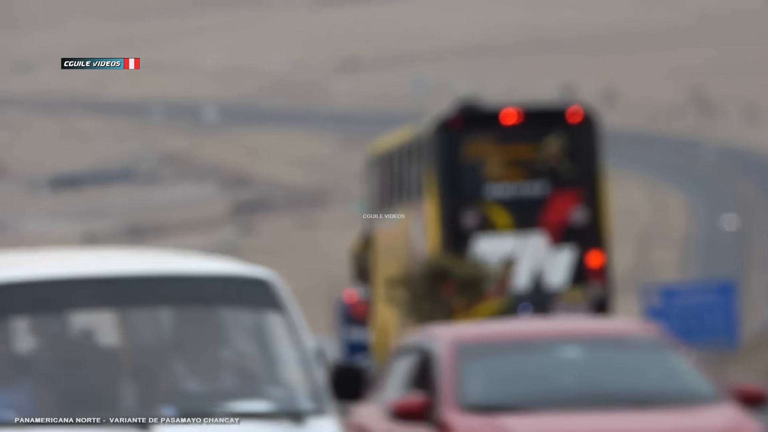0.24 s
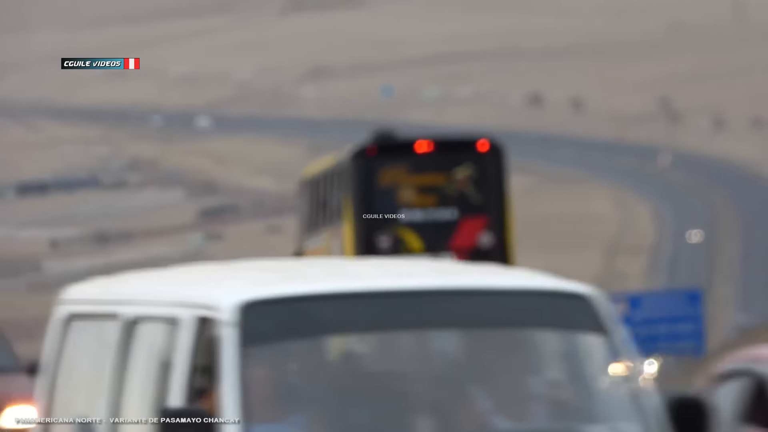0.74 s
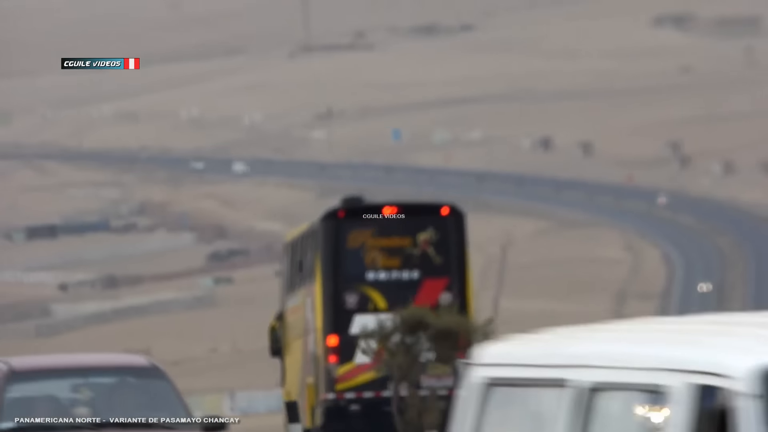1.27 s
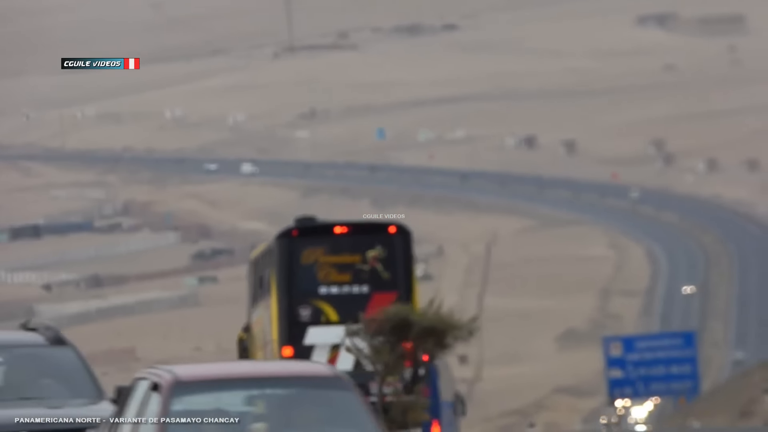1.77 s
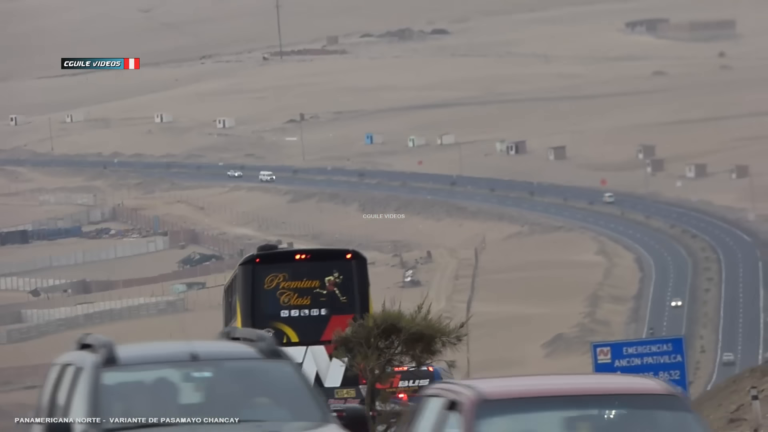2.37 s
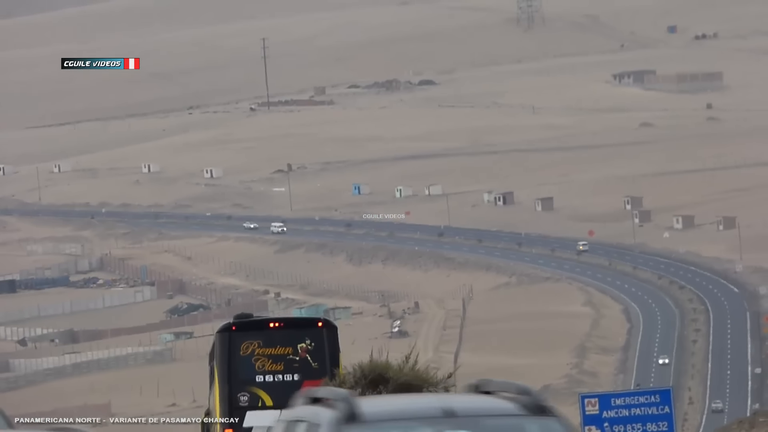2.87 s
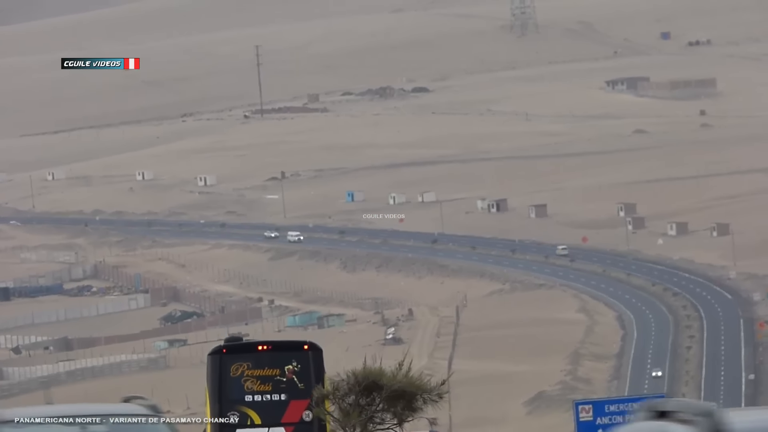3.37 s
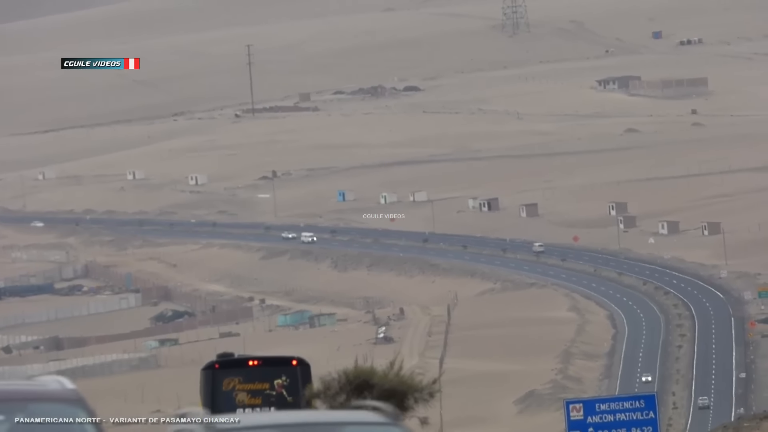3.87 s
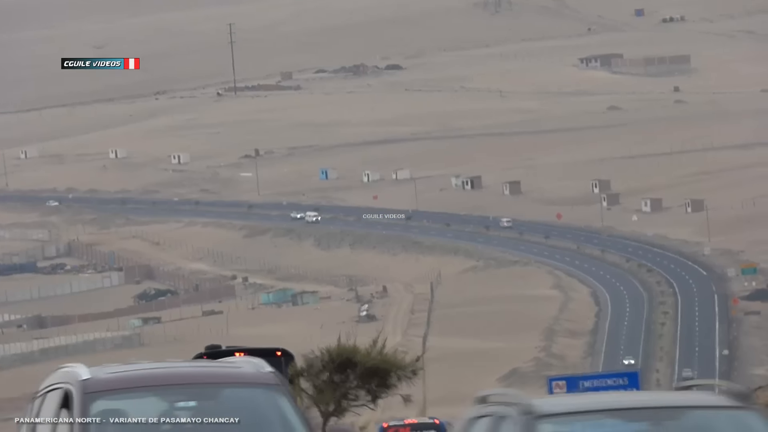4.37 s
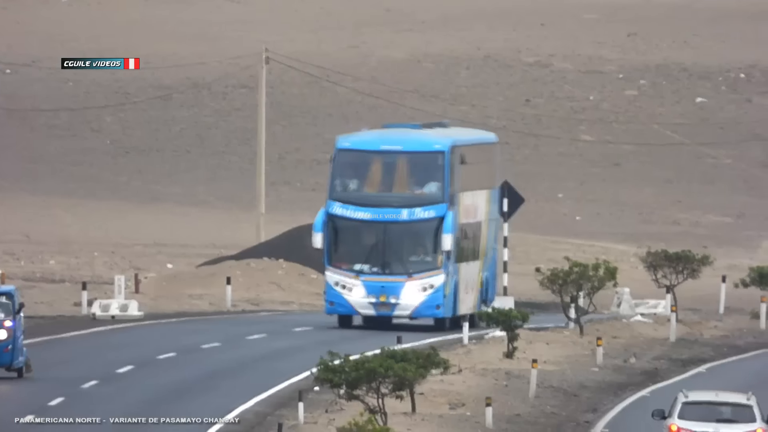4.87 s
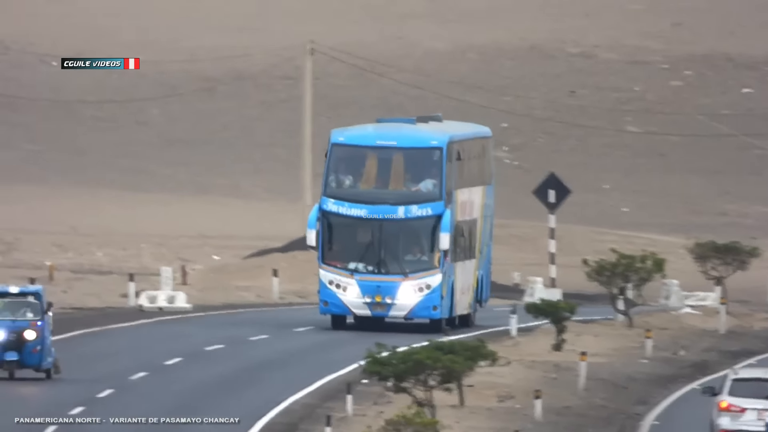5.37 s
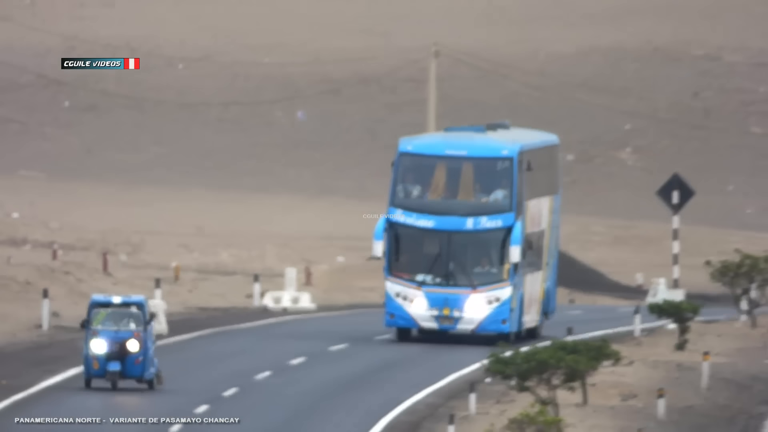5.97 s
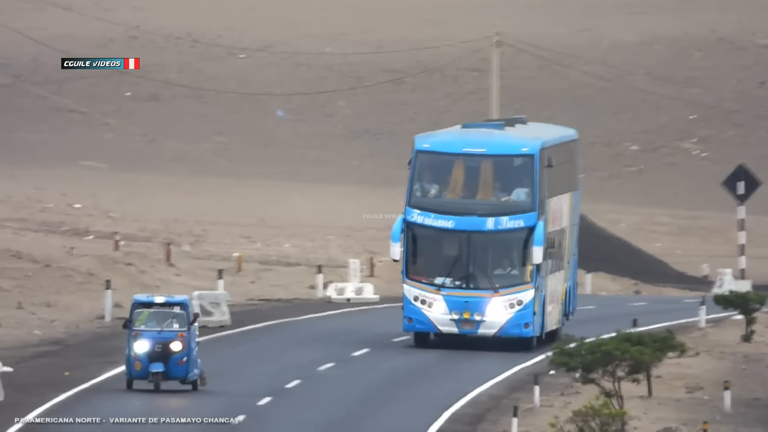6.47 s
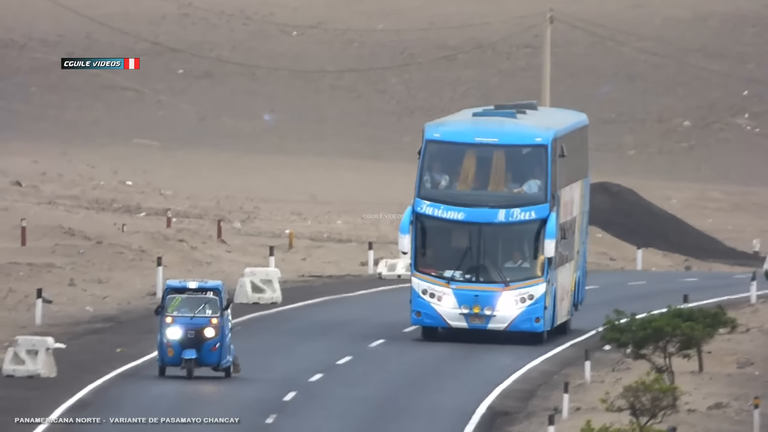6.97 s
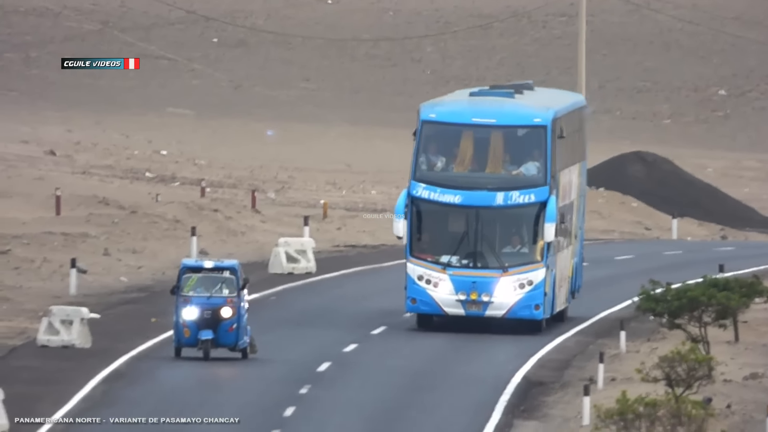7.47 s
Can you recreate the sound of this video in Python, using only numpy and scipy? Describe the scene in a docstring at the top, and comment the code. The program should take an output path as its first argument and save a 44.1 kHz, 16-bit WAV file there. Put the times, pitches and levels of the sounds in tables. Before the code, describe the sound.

Traffic heard from the roadside on a small stereo camera: a broad low-mid roar, then overlapping whooshes of tyres, strongest between two and four seconds, with wavering diesel drones and fast valve clatter. An abrupt short silence separates a second, softer view, where distant road noise and a higher engine drone continue with two small dry clicks, a thin whine, light tyre hiss and another engine rising at the end.

```python
"""First the wide roar of far traffic beside a busy highway, then near tyre noise swelling close to the camera.
Roar and tyre noise are random spectra; road echoes comb the tyres, and drifting bands swell or hollow the hiss.
Diesels drone as wavering orders of their firing rates, and a truck's valves clatter at every firing.
A short silence marks the cut to a second shot, where a thin whine and two small camera ticks are heard.
A small camera with two microphone ports listens."""
import sys
import numpy as np
from scipy import signal
from scipy.fft import rfft, irfft
from scipy.io import wavfile
from scipy.ndimage import uniform_filter1d

SR = 44100
rng = np.random.default_rng(int(sys.argv[2]) if len(sys.argv) > 2 else 0)


def unload_audio(sound):
    """Save the sound as a 16-bit wav file, at the path given as the first command line argument."""
    columns = np.transpose(np.atleast_2d(sound))
    # keep every value between -1 and 1, then stretch to whole-number steps
    steps = np.round(np.clip(columns, -1, 1) * 32767)
    wavfile.write(sys.argv[1], SR, steps.astype(np.int16))


N = 340893
WINDOW, HOP = 1024, 256  # short-time spectra, samples
HZ = np.fft.rfftfreq(WINDOW, 1 / SR)
FRAMES = np.arange(N // HOP + 5) * HOP / SR  # frame times, s
CUT, RESUME = 4.828, 5.0864  # first shot starts to fade out, second starts to fade in, s


def gain_of(db):
    """Decibels to gain."""
    return 10 ** (np.asarray(db) / 20)


def evened(x):
    """Scales to rms 1."""
    return x / np.sqrt(np.mean(abs(x) ** 2) + 1e-20)


def smoothed(x, size, axis=-1):
    """Running average along one axis."""
    return uniform_filter1d(x, size=size, axis=axis)


def read(points, hz=HZ):
    """Reads a spectrum on a log-frequency axis, as a column."""
    f, value = np.transpose(points)
    return np.interp(np.log(hz + 1), np.log(f + 1), value)[:, None]


def columns(rows, t):
    """Each control column read at the times t, and where the rows are sounding."""
    s, *cols = np.transpose(rows)
    sounding = (t >= s[0] - .03) & (t <= s[-1] + .03)
    return [np.interp(t, s, c) for c in cols], sounding


def above(hz, octaves):
    """Rises from 0 to 1 around hz."""
    return (.5 + .5 * np.tanh(np.log2((HZ + 1) / hz) / octaves))[:, None]


def swell(t, s, db, rise, fall):
    """Gain of a source that nears, is loudest at s and leaves; silent in the other shot."""
    away = (t - s) / np.where(t < s, rise, fall)
    loss_db = -15.5 * np.log10(1 + away ** 2)
    same_shot = (t < RESUME - .1) == (s < RESUME - .1)
    return gain_of(db + loss_db) * same_shot


# The two microphone ports, three lists in each table: far roar of shot 1, all of shot 2, near vehicles of shot 1.
# How alike the ports hear. Each row: frequency in Hz, likeness (1 alike, 0 or less unrelated).
PORT_LIKENESS = [
    [(300, 2), (600, 0.8), (850, 0.3), (1050, 0.76), (1350, .2), (1700, 0.45), (2000, .8), (3000, .72),
     (4000, 0.75), (5000, 0.6), (6000, 0.5), (7000, 0.5), (9000, -0.1), (15000, 0.6)],
    [(300, 1.5), (600, 0.8), (850, 0.8), (1150, 0.74), (1400, 0.6), (1700, 0.8), (2000, 0.7), (2500, 0.7),
     (3500, .8), (4000, 0.8), (4500, .65), (6000, .47), (7000, 0.6), (9000, .5), (15000, 1.1)],
    [(300, .97), (600, .93), (800, .8), (1050, 0.6), (1400, 0.5), (1700, .9), (2500, 0.2), (3500, 1.2),
     (4000, .92), (5000, 1.5), (6000, 0), (7000, -0.3), (9000, -0.1), (15000, -0.5)],
]
# How far the left port leads. Each row: frequency in Hz, lead in radians.
PORT_LEAD = [
    [(300, -1), (600, -.5), (800, -1.1), (1000, -1.5), (1200, -1.9), (1380, -3.5), (1600, -5), (2000, -5.5),
     (3000, -6), (4500, -6.1), (6000, -6), (7000, -6.5), (9000, -7), (12000, -6.5)],
    [(300, -0.027), (600, .2), (900, -0.2), (1300, 0.52), (1700, .2), (2000, 0.31), (2500, -0.87),
     (3500, -.5), (4000, -0.12), (5000, -0.53), (6000, -0.37), (12000, -.05)],
    [(300, 0.1), (600, -0.9), (800, -2.1), (1000, -3), (1200, -4.4), (1400, -5), (2000, -6), (3500, -6),
     (4500, -7), (6000, -5.5), (7000, -7.5), (12000, -6.3)],
]
# How the level leans to one port. Each row: frequency in Hz, left over right in dB.
PORT_LEAN = [
    [(300, 12), (700, -1.5), (1000, -1.5), (1400, -6.5), (1800, -3), (2400, -4), (4400, -2), (8000, -0.5),
     (15000, -1.5)],
    [(300, -2.5), (750, 4.5), (1200, -2.5), (1600, 1.5), (2100, -1.5), (3000, -1), (5500, -0.5),
     (15000, -1)],
    [(300, -1), (700, 0), (1100, -7.5), (1600, -5.5), (2400, -5), (4400, -2), (8000, -13), (15000, -1)],
]


def noise(shape, level, port, ridges, patchy_db, ripple_db, side_db=0):
    """Random short-time spectra of rms level, with drifting patches, heard through both ports."""
    a, b, c, d, patches, ripple = rng.standard_normal((len(FRAMES), len(HZ), 6)).T
    patches = evened(smoothed(smoothed(patches, 8, axis=0), 24, axis=1))
    ripple = evened(smoothed(ripple, 60, axis=1))  # random narrow, slow ridges give the hiss a fine grain
    like, lead, lean_db = (np.where(FRAMES < CUT + .1, read(table[port]), read(table[1]))
                           for table in (PORT_LIKENESS, PORT_LEAD, PORT_LEAN))
    aside = above(450, 0.55)  # bass bends round the camera and reaches both ports alike
    # a swelling band comes from one place, so the ports hear it more alike
    unlike = np.clip((1 - like) / ridges ** .8, 0, 1)
    like = .987 * (1 - unlike * aside)
    left = a + 1j * b
    right = like * left + np.sqrt(1 - like ** 2) * (c + 1j * d)
    right = right * np.exp(-1j * lead * aside)
    lean = gain_of((lean_db + side_db) * aside / 2)
    unit = np.sqrt(3 / WINDOW)  # rms 1 once the windows overlap
    texture = gain_of(patchy_db * patches + ripple_db * ripple)
    return np.array([left * lean, right / lean]) * shape * level * unit * texture


# Far traffic, one list a shot. Each row: time in seconds, level in dB, lift of the treble above about 2.4 kHz in dB,
# lift of the bass below about 340 Hz in dB.
TRAFFIC = [
    [(0, -24, 0, 0.5), (.7, -23, -4.5, -6), (1.6, -22.5, 1.5, -2), (2.3, -24, 3, -3), (3.0, -22, 2, -1),
     (3.4, -23.5, 3.5, 4), (3.7, -27, 4, 2), (4.3, -22, 0.5, 0), (4.83, -18.5, -7.5, -3)],
    [(5.09, -27, 0.5, 4.5), (5.8, -27, -0.5, 2), (5.95, -27, 3.5, 4.5), (6.5, -26.5, 2, 3.5),
     (7.1, -27, 3, 4.5), (7.73, -25.5, 4, 1)],
]
# Spectrum of the far roar, one list a shot. Each row: frequency in Hz, relative level in dB.
ROAR = [
    [(30, -50.5), (50, -35), (65, -23), (85, -19), (130, -10), (220, -2.5), (500, -7.5), (850, -8.5),
     (1250, -15), (1900, -12.5), (2300, -17.5), (2700, -22), (5300, -27.5), (8000, -35.5), (15700, -48)],
    [(30, -53), (50, -39), (70, -26), (110, -10.5), (230, -0.5), (500, -3.5), (780, -7.5), (1150, -5),
     (1380, -19), (1600, -13), (2250, -19.5), (2700, -31), (4600, -31.5), (5150, -28.5), (5900, -35.5),
     (6900, -33), (8200, -40.5), (13000, -50), (15700, -60)],
]


def traffic(ridges):
    """The far roar of each shot; it brightens and rumbles by its own controls."""
    out = 0
    for shot, rows in enumerate(TRAFFIC):
        (roar_db, bright_db, rumble_db), sounding = columns(rows, FRAMES)
        tilt = gain_of(bright_db * above(2380, 0.15) + rumble_db * (1 - above(340, 0.82)))
        shape = evened(gain_of(read(ROAR[shot]))) * tilt
        level = gain_of(roar_db) * sounding
        out = out + noise(shape, level, shot, ridges, patchy_db=1.07, ripple_db=2.11)
    return out


# Swells of near tyre noise; one vehicle may have two. Each row: loudest moment in seconds, tyre level in dB,
# rise in seconds, fall in seconds, road echo comb spacing in Hz at that moment, widening in Hz a second,
# treble lift in dB, left over right in dB.
PASSES = [(1.5, -25.5, 0.44, 1, 1740, 96, -4.5, -0.5), (2.15, -23, 0.37, 0.4, 1474, 616, -21, -1),
          (3.15, -24.5, 0.53, 0.2, 1460, 560, 1, -1.5), (3.6, -23.5, 0.242, 0.42, 1660, 850, -1, -1.5),
          (4.75, -28.5, 0.22, .3, 1225, 250, 1.5, -1), (6.65, -38.5, 0.78, 0.18, 970, 22, 3, 0.5),
          (7.1, -41.5, 0.36, 0.37, 1295, 520, 6, 7.5)]
# Spectrum of the tyre noise. Each row: frequency in Hz, relative level in dB.
TYRES = [(100, -19.5), (200, -1.5), (350, 7), (600, 3.5), (1000, -2), (1600, 0.5), (2200, -7),
         (2700, -10.5), (3500, -10.5), (5300, -15.5), (6500, -22.5), (9000, -26), (15700, -33)]


def passing(ridges):
    """Tyre noise bouncing between road and chassis: a ridged comb that widens as the vehicle draws away."""
    power, side = 1e-20, 0
    bounce = .35 * np.exp(-HZ / 9000)[:, None]  # rough asphalt scatters the treble
    for s, tyre_db, rise, fall, comb_hz, widening, treble_db, side_db in PASSES:
        spacing = np.maximum(comb_hz + widening * (FRAMES - s), 700)  # tightest comb 700 Hz
        phase = 2 * np.pi * HZ[:, None] / spacing
        comb = (1 - bounce ** 2) / (1 + bounce ** 2 - 2 * bounce * np.cos(phase))
        gain = swell(FRAMES, s, tyre_db, rise, fall) * gain_of(treble_db * above(2840, 0.14))
        part = comb * gain ** 2
        drift_db = 1 * np.clip(FRAMES - s, -1, 1)  # across the ports, 1 dB a second
        power = power + part
        side = side + part * (side_db + drift_db)
    shape = evened(gain_of(read(TYRES)))
    return noise(shape, np.sqrt(power), 2, ridges, patchy_db=0.5, ripple_db=3.0, side_db=side / power)


# Bands of road hiss that swell (+) or hollow out (-), some sliding upward, others nearly still.
# Each row: middle in seconds, depth in dB, half length in seconds, frequency in Hz, slide in Hz a second, width in Hz.
BANDS = [(2.15, 3.5, .45, 2630, 1200, 330), (2.1, 2.5, 0.79, 1650, 900, 310),
         (3.035, -6.5, 0.22, 1720, 790, 610), (3.01, -7, 0.36, 3000, 600, 1100),
         (3.19, 5, 0.25, 1500, 500, 190), (3.51, 4, 0.13, 1770, 600, 180),
         (3.34, -4.5, 0.92, 1100, 98, 220), (3.5, 4.5, 0.19, 3200, 3500, 400),
         (3.1, 3, .25, 4200, 1600, 690), (3.26, 6.5, .2, 5500, 800, 620), (3.55, -1.5, .3, 2340, 1100, 300),
         (3.72, 3, .2, 2000, 500, 300), (3.45, 3.5, 0.19, 4050, 50, 300), (3.4, -6.5, .09, 4760, 50, 1100),
         (3.36, -6.5, .09, 7800, 50, 3200), (3.93, 4.5, .3, 5000, 1400, 840),
         (3.61, 4.5, 0.085, 5000, 500, 1300), (4.15, 2.5, 0.32, 6150, 300, 350),
         (3.05, 3, .2, 8100, 50, 1200), (3.3, 9, .1, 8100, 50, 600), (1.55, 4.5, .2, 8200, 1000, 1500),
         (4.3, -5.5, .3, 7300, 50, 900), (0.6, -5, 0.15, 3120, 50, 370), (0.12, 4.5, 0.23, 6300, 50, 450),
         (0.55, 0, 0.81, 2200, 300, 560), (4.33, -9, .3, 3510, 50, 350), (6.5, -3, .35, 1300, 100, 300),
         (2.06, -5, 0.15, 4300, 50, 880), (1.63, 2.5, 0.31, 3900, 100, 260),
         (7.09, 7, 0.3, 2570, 1000, 450), (6.5, 3, 0.17, 4030, 200, 400), (6.9, 4, 0.14, 4120, 200, 200),
         (6.7, -2, .6, 540, 10, 140), (3.23, -2.5, .4, 774, 50, 180), (7.0, -4, .35, 2830, 1300, 220),
         (7.6, -3.5, 0.16, 2750, 300, 430), (6.3, 3, .3, 6950, 300, 700), (6.45, 4, .2, 8800, 50, 1100),
         (7.36, 2.5, .35, 6700, 1300, 660), (7.15, -1, .45, 7800, 50, 600), (5.55, 1.5, .35, 3830, 10, 160),
         (4.68, 4, 0.18, 8300, 50, 3000), (7.5, 6, .3, 3570, 10, 200), (6.72, 4, 0.53, 3800, 200, 570),
         (7.36, -8, .3, 4200, 50, 510), (6.95, 4.5, 0.2, 6100, 500, 770), (7.5, 2, .3, 5300, 50, 490),
         (6.03, 4.5, .2, 1770, 50, 420), (6.56, 4, .35, 1280, 50, 290), (6.2, -7, 0.35, 640, 44, 120),
         (6.8, 6.5, 0.23, 2950, 50, 300), (0.45, 5, 0.28, 880, 50, 180), (0.37, -4, 0.59, 1290, 50, 270),
         (1.6, 4, 0.9, 526, 25, 70), (1.15, 2.5, .4, 1900, 50, 610), (.3, 2.5, 0.65, 200, 10, 90),
         (2.05, 5, 0.34, 155, 10, 54), (5.37, -6.5, 0.48, 840, 20, 180), (7.37, 5.5, 0.56, 264, 10, 39),
         (7.45, 3, 0.43, 660, 20, 83)]


def bands():
    """Gain over pitch and time from the swelling and hollowing bands."""
    total_db = 0
    for s, db, half, hz, slide, width in BANDS:
        aged = (FRAMES - s) / half
        detuned = 2 * (HZ[:, None] - hz - slide * (FRAMES - s)) / width
        total_db = total_db + db * np.exp(-aged ** 2 - detuned ** 2 / 2)
    return gain_of(total_db)


def engine(diesel, orders, waver=.003, flutter_db=1.5):
    """Low orders of the firing rate as wavering tones, each fluttering alone; also returns the firing count."""
    t = np.arange(N) / SR
    firing, swells = diesel
    drift = evened(smoothed(smoothed(rng.standard_normal(N), 3000), 3000))
    rate = np.interp(t, *np.transpose(firing)) * (1 + waver * drift)
    turns = np.cumsum(rate) / SR + rng.random()
    steps = np.arange(0, N + 400, 200) / SR
    wander = rng.standard_normal((len(orders), len(steps)))
    flutter = gain_of(flutter_db * evened(smoothed(smoothed(wander, 8), 8)))
    drone = 0
    for order, row, f in zip(orders, swells, flutter):
        level = np.interp(t, steps, f) * np.sqrt(2) * swell(t, *row)
        drone = drone + level * np.sin(2 * np.pi * order * turns)
    return drone, turns


# Bus diesel, two lists. Each row of the first: time in seconds, firing rate in Hz.
# Each row of the second, one swell of an order; an order may have several: loudest moment in seconds,
# level in dB, rise in seconds, fall in seconds.
BUS = ([(0, 106.8), (1.5, 107.5), (2.2, 105.6), (2.65, 107.5), (3.0, 107.1), (3.7, 103.8)],
        [(0.73, -41.5, 1.1, 0.45), (2.8, -42, .6, .6), (2.4, -32, 0.09, 0.15), (2.94, -22, 0.26, 0.062),
        (2.33, -31.5, 0.16, .1), (2.62, -29, .04, .04), (2.95, -32, 0.22, 0.28)])


def bus():
    """Diesel drone on orders 1, 3 and 4 of the firing rate."""
    return engine(BUS, (1, 1, 3, 3, 4, 4, 4))[0]


# Van diesel, two lists with the same columns as the bus.
VAN = ([(1.0, 98), (2.1, 95.7)], [(1.6, -39, 0.25, 0.33)])


def van():
    """Diesel drone on the firing rate alone."""
    return engine(VAN, (1,))[0]


# Truck diesel, two lists with the same columns as the bus.
TRUCK = ([(1.2, 57.76), (2.7, 59.43), (3.55, 57.67), (3.9, 58.7), (4.83, 59.04)], [(2.2, -49, 0.48, 0.8),
          (4.4, -48.5, 0.41, 0.63), (3.3, -36.5, 0.14, 0.055), (4.21, -31, 0.4, 0.61),
          (1.7, -38, 0.61, 0.19), (2.96, -30.5, 0.25, 0.28), (3.46, -27, 0.22, 0.04)])


def truck():
    """Diesel drone on orders 1, 2 and 4, with the firing count that times the clatter."""
    return engine(TRUCK, (1, 1, 2, 2, 4, 4, 4))


# Truck valve clatter. Each row: loudest moment in seconds, level in dB, rise in seconds, fall in seconds.
CLATTER = [(3.0, -37.5, 0.23, 0.37), (3.7, -44, 0.17, 0.46), (4.8, -43, 0.18, .3)]


def clatter(turns):
    """A puff of treble noise at every firing, dying away over part of each turn of the count."""
    level = sum(swell(np.arange(N) / SR, *row) for row in CLATTER)
    hiss = rng.standard_normal(N) + 1.4 * rng.standard_normal((2, N))  # shared by the ports, plus each its own
    band = signal.butter(2, [2500, 7000], "bandpass", fs=SR, output="sos")
    puffs = signal.sosfilt(band, hiss) * np.exp(-(turns % 1) / .31)
    return evened(puffs) * level * gain_of([[-1.5], [1.5]])  # leans to the right port


# Coach diesel, two lists with the same columns as the bus.
COACH = ([(5.09, 198.9), (6.8, 202.7)], [(5.65, -32.5, 0.43, 0.27), (6.65, -34, 0.35, 0.18)])


def coach():
    """Diesel drone on the firing rate, in two swells."""
    return engine(COACH, (1, 1))[0]


# Thin whine, two lists with the same columns as the bus, its pitch in Hz in place of the firing rate.
WHINE = ([(5.09, 3800), (6.0, 3808)], [(5.52, -55.5, 0.17, .25)])


def whine():
    """One thin, steadier tone, perhaps a turbocharger."""
    return engine(WHINE, (1,), waver=0.00074)[0]


# Small ticks on the camera. Each row: start in seconds, peak in dB, top frequency in Hz.
TICKS = [(5.201, -33, 9500), (6.0082, -32, 11500)]


def ticks():
    """Very short bright cracks of band-passed noise, the burst dying 60 dB in 3.3 ms."""
    out, t = np.zeros(N), np.arange(130) / SR
    for s, db, top_hz in TICKS:
        band = signal.butter(2, [5500, top_hz], "bandpass", fs=SR, output="sos")
        burst = rng.standard_normal(len(t)) * gain_of(-60 * t / 0.0033)
        crack = signal.sosfilt(band, burst)
        out[round(s * SR):][:len(t)] += gain_of(db) * crack / abs(crack).max()
    return out


# Car engine, two lists with the same columns as the bus.
CAR = ([(7.0, 260), (7.73, 249)], [(7.4, -34, 0.36, .35)])


def car():
    """Engine drone on the firing rate alone."""
    return engine(CAR, (1,))[0]


def scene():
    """All road sources summed at the two ports."""
    ridges = bands()
    spectra = (traffic(ridges) + passing(ridges)) * ridges
    road = signal.istft(spectra, nperseg=WINDOW, noverlap=WINDOW - HOP)[1][:, :N]
    truck_drone, turns = truck()
    drones = bus() + van() + truck_drone + coach() + car()
    return road + drones + clatter(turns) + whine() + ticks()


# Camera body dip and port resonance. Each row: frequency in Hz, width in Hz, gain in dB.
BODY = [(381.7, 45.5, -11.5), (4040, 860, 6.5), (4376, 180, -5.5)]


def record(dry):
    """Camera colour, converter offset, the cut between shots, the band limit."""
    hz, t = np.fft.rfftfreq(N, 1 / SR), np.arange(N) / SR
    colour_db = sum(db / (1 + (2 * (hz - f) / width) ** 2) for f, width, db in BODY)
    heard = irfft(rfft(dry) * gain_of(colour_db), N) - .00257  # converter offset
    fading = np.clip(t - CUT, 0, 1)
    fade_out = gain_of(-3200 * fading) * (fading < .035)  # 3200 dB a second, silent after 35 ms
    fade_in = np.clip((t - RESUME) / 0.0033, 0, 1)
    heard = heard * np.where(t >= RESUME, fade_in, fade_out)
    band_limit = signal.firwin(511, 15750, window=("kaiser", 9), fs=SR)  # low-pass, Hz
    return signal.oaconvolve(heard, band_limit[None], "same")


dry = scene()
out = record(dry)
unload_audio(out)
```